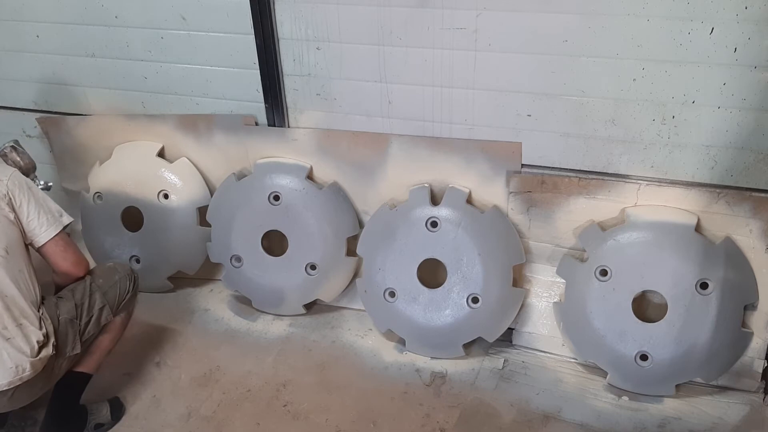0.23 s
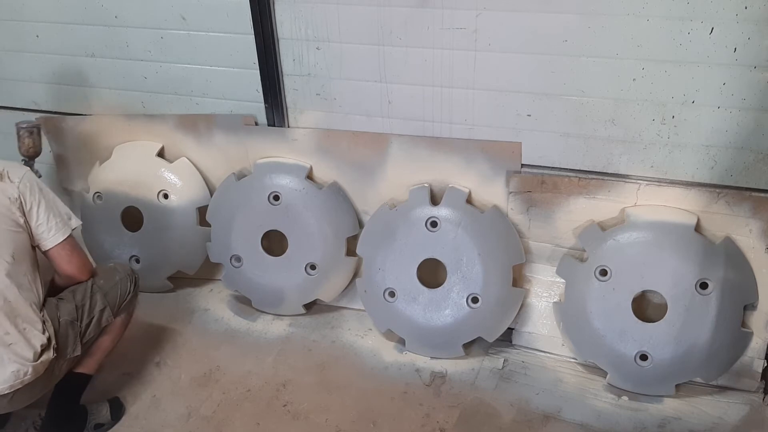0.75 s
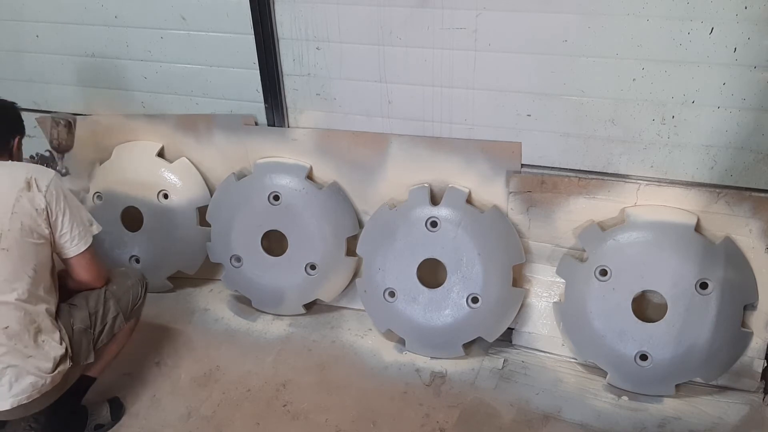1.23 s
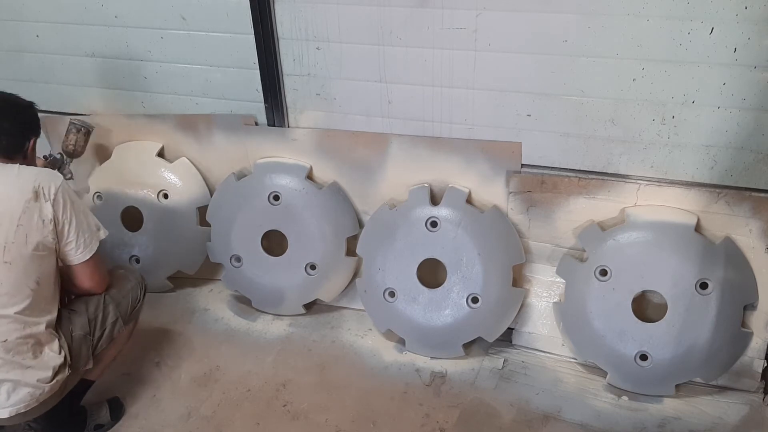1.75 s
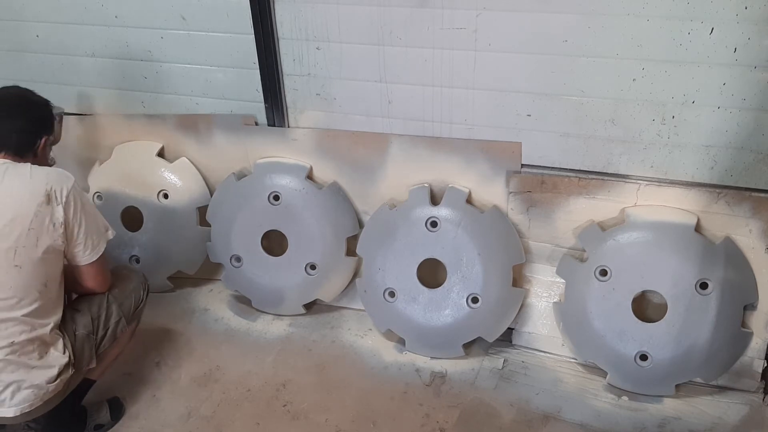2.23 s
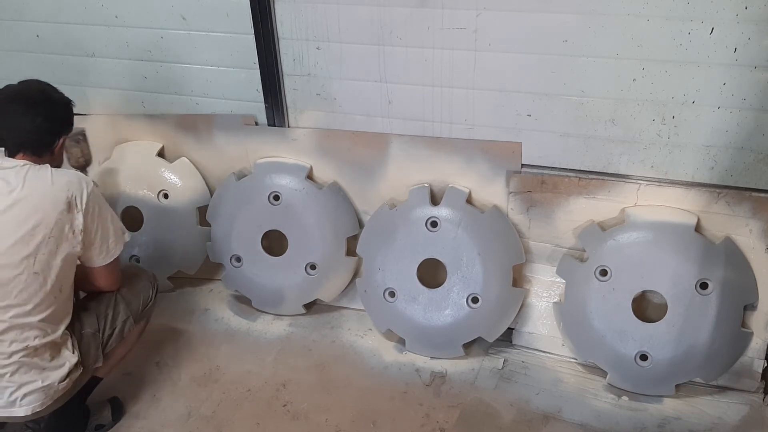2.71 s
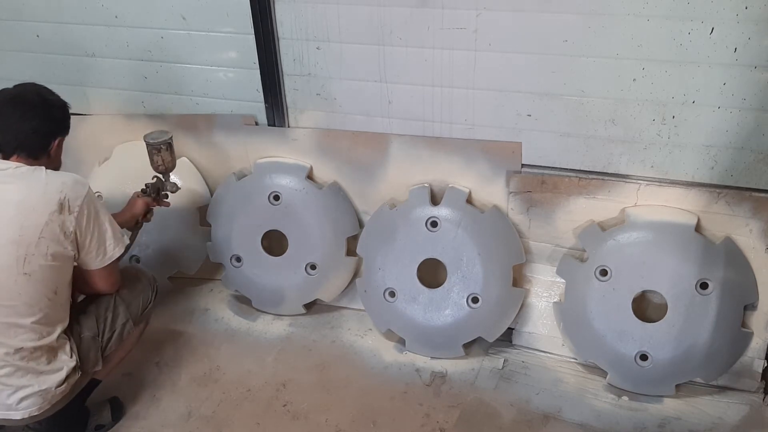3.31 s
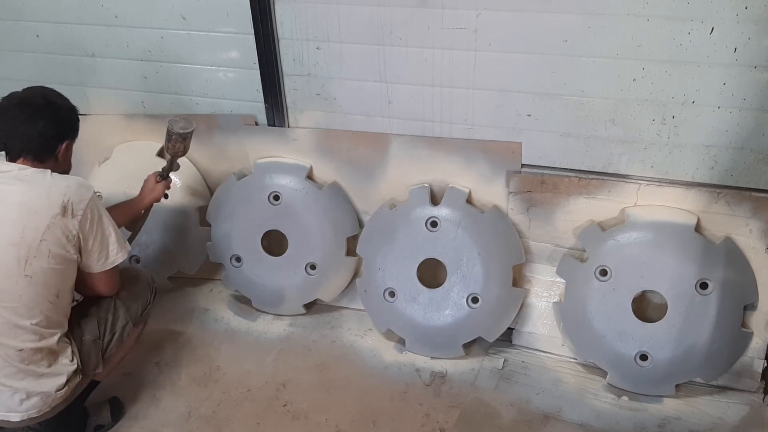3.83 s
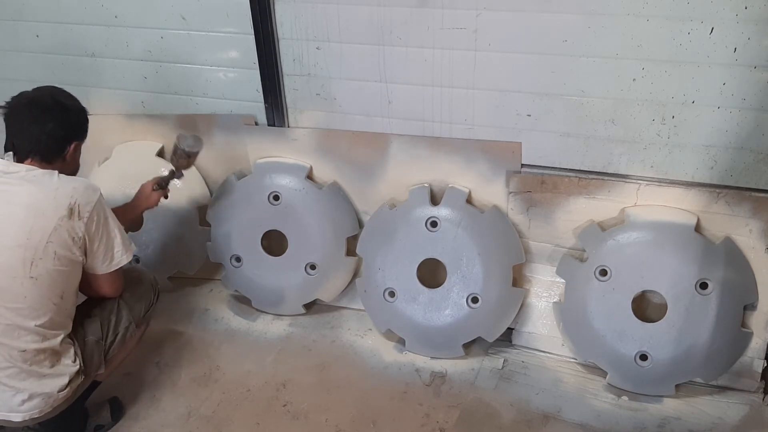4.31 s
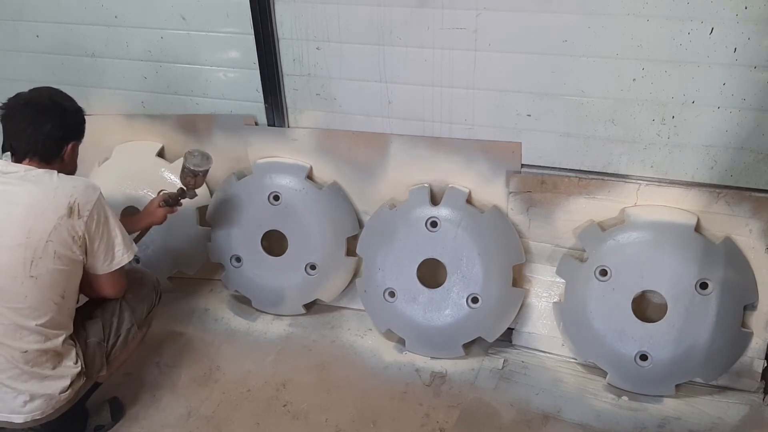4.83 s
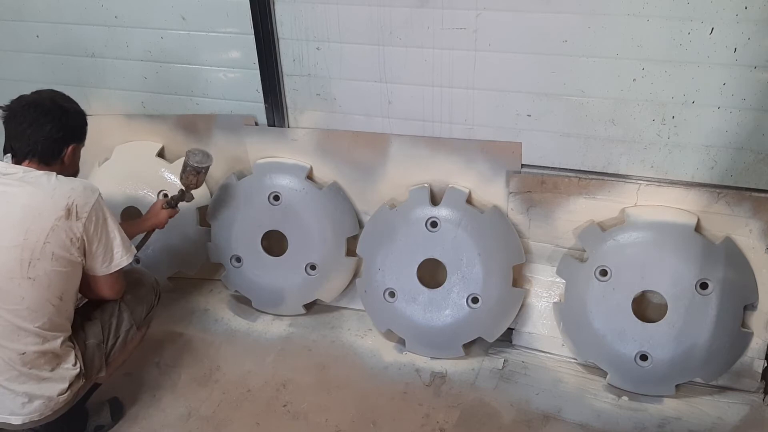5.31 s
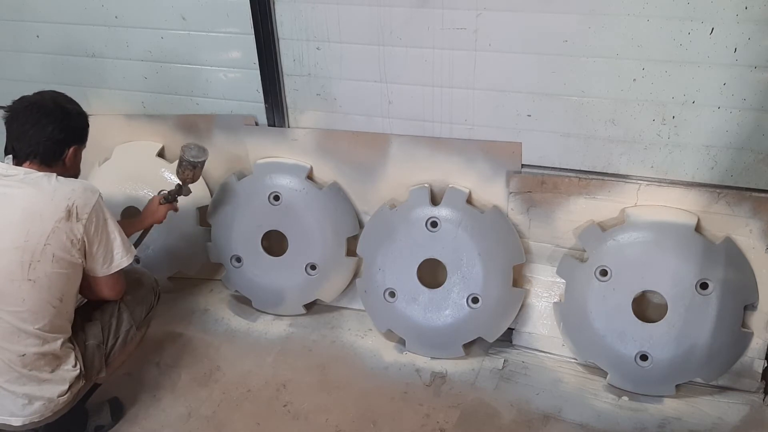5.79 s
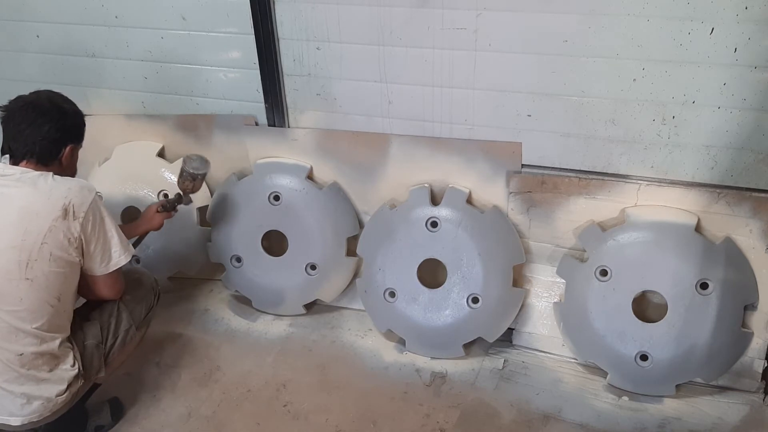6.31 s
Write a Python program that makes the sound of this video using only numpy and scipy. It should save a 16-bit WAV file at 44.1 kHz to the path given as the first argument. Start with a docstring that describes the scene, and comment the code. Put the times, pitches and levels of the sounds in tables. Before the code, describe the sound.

Close stereo pickup of a paint gun spraying metal discs: crisp, airy blasts of about a third of a second, the fourth roughly twice as long, separated by quiet gaps. Something stiff scrapes and knocks on the floor at the start, then only faint scuffs return. Tiny metal clicks with leaking air precede some blasts, and one ends the scene. The hard-walled room adds a thin, ringing tail.

```python
"""In a bare workshop, a compressed-air paint gun is triggered eight times at heavy iron discs.
Each pull is six bands of noise, from nozzle hiss to thump, shaped by air pressure; the discs ring on after.
Short noise ticks with a thin leak come before five of the pulls and once after the last one.
Something stiff scuffs over the floor: random small slips ring a sheet, with larger knocks among them.
Walls add standing waves and a long tail over a faint hiss. Two close microphone ports hear it from one side."""
import sys
import numpy as np
from scipy import signal
from scipy.fft import rfft, irfft, next_fast_len
from scipy.io import wavfile
from scipy.ndimage import uniform_filter1d

SR = 44100
rng = np.random.default_rng(int(sys.argv[2]) if len(sys.argv) > 2 else 0)


def volts_from_decibels(level):
    """Turn decibel levels (scalar or array-like) into linear amplitude factors."""
    exponent = np.asarray(level, float) / 20
    return 10 ** exponent


def wrap_up_sound(samples):
    """Save the sound to the file named by the first command line argument, as 16-bit audio."""
    columns = np.atleast_2d(samples).T
    # keep every value between -1 and 1, then stretch to whole-number steps
    tamed = np.clip(columns, -1, 1)
    steps = np.round(tamed * 32767).astype(np.int16)
    wavfile.write(sys.argv[1], SR, steps)


N = 288855


def evened(x):
    """Scales to rms 1."""
    return x / np.sqrt(np.mean(x ** 2) + 1e-20)


def read(points, hz, axis=1):
    """Reads a column of a table on a log-frequency axis."""
    table = np.transpose(points)
    return np.interp(np.log(hz + 1), np.log(table[0] + 1), table[axis])


def add(mix, s, sound):
    """Mixes a sound in from time s, trimmed to the length of the mix."""
    at = round(s * SR)
    part = mix[:, max(at, 0):][:, :sound.shape[1] + min(at, 0)]
    part += sound[:, max(-at, 0):][:, :part.shape[1]]


def humps(peaks, hz):
    """Sums the responses of resonances given as (Hz, width in Hz, dB)."""
    return sum(volts_from_decibels(db) / (1 + 2j * (hz - centre) / width) for centre, width, db in peaks)


def ring(hz, width, count=2048):
    """A damped swing with a soft start, peak 1; a wider resonance dies faster."""
    t = np.arange(count) / SR
    soft_start = 1 - np.exp(-t * hz)
    swing = soft_start * np.exp(-np.pi * width * t) * np.sin(2 * np.pi * hz * t)
    return swing / abs(swing).max()


def port_noise(count, gain, lead_s, centred=0):
    """Noise at both ports: a shared part reaches the left port first; gain(hz) colours it all."""
    # Each row: frequency in Hz, likeness of the two ports from 0 to 1.
    likeness = [(60, 0.69), (200, 0.94), (600, 0.7), (1500, 0.11), (4000, 0.095), (9000, 0.13),
                (13000, 0.12)]
    # Shade of the housing. Each row: frequency in Hz, left minus right in dB.
    housing_shade = [(100, -1), (700, 0), (2400, -1), (4400, 0.5), (8000, 0), (11000, -3), (15000, -2.5)]
    size = next_fast_len(count)
    hz = np.fft.rfftfreq(size, 1 / SR)
    left, other = rfft(rng.standard_normal((2, size)))
    alike = np.clip(read(likeness, hz), 0, 1)
    delayed = left * np.exp(-2j * np.pi * hz * lead_s)
    right = alike * delayed + np.sqrt(1 - alike ** 2) * other
    # the top treble narrows to the middle
    same = np.clip(centred, 0, 1) * np.clip((hz - 10800) / 2600, 0, 1)
    right = same * left + np.sqrt(1 - same ** 2) * right
    lean = volts_from_decibels(read(housing_shade, hz) / 2)
    ports = np.array([left * lean, right / lean])
    return evened(irfft(ports * gain(hz), size)[:, :count])


def burst(row, pull, lead_us, centred, hum_db, flutter_db=0.5):
    """Turbulent air: each part of the jet swells fast as the valve opens and dies away after release."""
    # Colour of the jet. Each row: frequency in Hz, relative level in dB per Hz.
    jet_colour = [(24, -34.5), (40, -19), (250, -10), (380, -11), (620, -9), (1400, -7.5), (2000, -10.5),
                  (3080, -7.5), (5500, -2.5), (7750, 0.5), (8300, -2), (9000, -7), (10500, -0.5),
                  (12200, 4.5), (13500, 0.5), (15000, 4), (15700, -2)]
    # Six parts of the jet, high to low. Each row: low edge in Hz, high edge in Hz,
    # fall in dB per s as the air bleeds out.
    jet_parts = [(8800, SR, 253), (3700, 9920, 199.5), (1780, 4030, 173.5), (444, 1800, 170.5),
                 (126, 378, 186), (40.9, 158, 179)]
    # How fast each part swells up to the opening, in dB per ms.
    opening_rises = [3.1, 2.2, 1.9, 1.7, 1.5, 1.2]
    # Each part while the trigger is held. Each row: level against the hiss in dB, share of the surge,
    # share of the body, shortfall at opening in dB, build-up in s, droop at release in dB, droop time in s.
    held_parts = [(0, 0.91, 0.27, 2.5, .012, 1.5, .03), (-3.5, 0.4, 0.68, 4.5, 0.033, 2, 0.066),
                  (-9, 0.00073, 0.73, 9.5, 0.03, 5.5, .07), (-18.5, 0, 0.84, 14.5, 0.088, 8.5, 0.049),
                  (-38, 0.061, 0.66, 22, .05, 6.5, .05), (-50.5, 0.045, 0.32, 0.5, .05, -1.5, .05)]
    # 1 for each part that swells when the jet crosses an edge or a hole.
    gusty = [0, 0, 0, 1, 1, 1]
    # Such crossings. Each row: time in s, half length in s, roar in dB, buffeting in dB, thump in dB.
    crossings = [(.09, 0.065, -57, -66, -79), (0.333, .12, -45.5, -53.5, -77), (0.432, .04, -63, -59, -61),
                 (0.884, 0.033, -55, -72, -59), (1.12, 0.057, -77, -63, -79), (1.243, 0.057, -60, -50, -65),
                 (1.638, 0.068, -62, -74, -69), (1.79, 0.042, -52, -47.5, -66),
                 (1.913, 0.072, -55, -48, -62.5), (2.511, 0.065, -68, -56, -59),
                 (2.65, .08, -55, -57.5, -68), (2.79, .06, -50.5, -70, -76), (2.924, 0.067, -54, -72, -82),
                 (3.056, .05, -62, -65, -80), (3.899, 0.06, -56, -51.5, -58.5),
                 (4.025, 0.085, -53.5, -63.5, -75), (4.14, 0.045, -64.5, -57, -68),
                 (4.587, 0.043, -52, -50.5, -59), (4.686, 0.082, -55.5, -60, -68),
                 (5.266, .06, -57, -61, -68), (5.357, 0.067, -52.5, -69, -86),
                 (5.479, 0.076, -62, -57.5, -81), (5.895, 0.043, -58, -59, -59),
                 (5.987, .05, -54.5, -55, -74), (6.07, 0.09, -59, -58.5, -70.5)]
    # Air blown across a hole in the disc hums: frequency in Hz, width in Hz.
    hollow = (253.6, 18)

    s, held, hiss_db, surge_db, body_db = row
    drain, pan_db, lift_db = pull
    t = np.arange(-.05, held + .45, 1 / SR)
    now = np.clip(t, 0, held)
    # stored pressure peaks 21 ms after opening, then drains to the steady flow
    surge = surge_db * np.exp(-((now - 0.021) / drain) ** 2)
    # the paint needle shuts 30 ms before the air valve
    surge += lift_db * np.exp(-((held - 0.03 - now) / 0.036) ** 2)
    gusts = [g for g in crossings if s - .02 < g[0] < s + held + .02]
    out = np.zeros((2, len(t)))
    for k, ((lo_hz, hi_hz, fall), rise, part) in enumerate(zip(jet_parts, opening_rises, held_parts)):
        def colour(hz):
            band = 1 / np.sqrt((1 + (lo_hz / (hz + 1)) ** 8) * (1 + (hz / hi_hz) ** 8))
            hum = abs(2 + humps([(*hollow, hum_db)], hz))
            return band * volts_from_decibels(read(jet_colour, hz)) * hum
        rel_db, by_surge, by_body, short_db, build, droop_db, droop = part
        flow_db = hiss_db + rel_db + by_surge * surge + by_body * body_db
        flow_db = flow_db - short_db * np.exp(-now / build) - droop_db * np.exp((now - held) / droop)
        flow = volts_from_decibels(flow_db)
        if gusty[k]:
            # parts 3, 4 and 5 take the roar, buffeting and thump columns
            flow = flow + sum(volts_from_decibels(g[k - 1]) * np.exp(-((s + now - g[0]) / g[1]) ** 2) for g in gusts)
        edges_db = 1000 * rise * np.maximum(-t, 0) + fall * np.maximum(t - held, 0)
        eddies = evened(uniform_filter1d(rng.standard_normal(len(t)), size=60))  # the flow flutters
        level = flow * volts_from_decibels(flutter_db * eddies - edges_db)
        out += level * port_noise(len(t), colour, lead_us / 10 ** 6, centred)
    pan_db = pan_db + 0.11 * surge  # the surge evens out left and right
    return s + t[0], out * volts_from_decibels([pan_db / 2, -pan_db / 2])


def iron(x):
    """The jet drives the discs; each is tuned a little differently, so every mode is a dense, fuzzy cluster."""
    # Each row: frequency in Hz, width in Hz, relative level in dB, time to fall 60 dB in s.
    disc_modes = [(1356, 30, -20, .7), (1550, 30, -17, .9), (2905, 40, -12, 1.1), (5440, 170, -18, .9),
                  (7515, 150, -20, 1), (12360, 160, -17, .9), (15350, 120, -17, 1)]
    t, bins = np.arange(SR) / SR, np.fft.rfftfreq(SR, 1 / SR)
    out = 0
    for hz, width, db, t60 in disc_modes:
        band = np.exp(-2 * ((bins - hz) / width) ** 2)
        cluster = evened(irfft(rfft(rng.standard_normal((2, SR))) * band))
        decay = volts_from_decibels(db - 60 * t / min(t60, 1.2))
        out = out + decay * cluster * np.sqrt(width / (t60 * SR ** 2))
    return signal.fftconvolve(x, out, axes=1)[:, :N]


def tick(s, tick_db, leak_db):
    """The trigger takes up its slack: a short metal tick over a thin leak of air, both of noise."""
    # Each row: frequency in Hz, relative level in dB per Hz.
    tick_colour = [(880, -67.5), (1500, -27.5), (1770, -24.5), (2780, -10), (4580, -6), (5690, 2),
                   (8750, -6), (13700, 3.5), (15600, -6)]
    t = np.arange(round(.12 * SR)) / SR
    click = volts_from_decibels(tick_db - 60 * t / 0.0068)
    leak = volts_from_decibels(leak_db - 60 * t / .5) * np.minimum((t[-1] - t) / .01, 1)
    attack = np.minimum(t / .0007, 1)
    noise = port_noise(len(t), lambda hz: volts_from_decibels(read(tick_colour, hz)), 9e-5)
    return s - .001, (click + leak) * attack * noise


def scuff(s, rise, fall, top_db, bright_db, slips_per_s=350, spread_db=3.5, apart=.45):
    """Uneven small slips, each setting off one resonance of a stiff sheet."""
    # What rings under the scuff. Each row: frequency in Hz, width in Hz, relative level in dB.
    sheet = [(328, 140, -13), (416, 65, -4.5), (583, 210, 1.5), (600, 140, -5), (800, 120, -1),
             (963, 97, -1.5), (1205, 160, -2), (1507, 220, -6), (2060, 400, -12), (3200, 2200, -13.5)]
    t = np.arange(-.3, .4, 1 / SR)
    away = np.where(t < 0, t / rise, t / fall)
    rung = np.zeros((2, len(t)))
    for hz, width, db in sheet:
        when, size, sign = rng.random((3, 2, len(t)))
        slipping = when < slips_per_s * width / (100 * SR)  # rate is per 100 Hz of width
        slips = slipping * volts_from_decibels(-spread_db * np.log(size + .02)) * np.sign(sign - .5)
        # less alike at the two ports higher up
        ports = slips[0] + apart * np.array([[1], [-1]]) * slips[1] * min(hz / 1200, 1.5)
        lift_db = bright_db * max(np.log2(hz / 700), 0)
        rung += volts_from_decibels(db + lift_db) * signal.oaconvolve(ports, ring(hz, width)[None])[:, :len(t)]
    # 22 dB down once the rise or fall time away from the top
    return s + t[0], volts_from_decibels(top_db - 22 * away ** 2) * evened(rung)


def knocks():
    """Single strong slips, each a damped swing a few cycles long."""
    # Each row: time in s, relative level in dB, frequency in Hz.
    large_slips = [(0.009, -35.5, 581), (0.134, -39, 620), (0.266, -30, 617), (0.338, -41, 1310),
                   (0.344, -47, 565), (0.352, -45, 1280), (0.448, -40, 616), (0.678, -34.5, 579),
                   (0.724, -41, 545), (0.805, -35.5, 676), (0.819, -39.5, 503), (0.843, -42, 614)]
    out = np.zeros((1, N))
    for s, db, hz in large_slips:
        add(out, s, volts_from_decibels(db) * ring(hz, 110)[None])
    return out


def standing(x, share=1.1):
    """Low standing waves between the walls lift and prolong narrow bands."""
    # Each row: frequency in Hz, width in Hz, relative level in dB.
    wall_modes = [(156.2, 13.3, -7.5), (249.5, 4.3, -3.5), (318, 8.5, -3.5), (429, 13, -13.5),
                  (528, 9.6, 1.5), (620.5, 6.4, 0.5), (729, 13, -7.5), (900, 11, -23.5), (1320, 28, -20),
                  (1525, 21, -1), (2041, 23, 0)]
    size = next_fast_len(N + SR)
    response = 1 + share * humps(wall_modes, np.fft.rfftfreq(size, 1 / SR))
    return irfft(rfft(x, size) * response, size)[:, :N]


def shop(x):
    """Dense reflections, each band dying at its own speed, unlike at the two ports."""
    # Long tail of the shop. Each row: frequency in Hz, level in dB, time to fall 60 dB in s.
    tail_bands = [(100, -35, 0.52), (500, -18, 0.77), (2000, -18.5, 0.28), (3500, -37, 2.2),
                  (4970, -26, 1.1), (5600, -21, 1.8), (7500, -41.5, 1.9), (8800, -37.5, 0.62),
                  (10200, -32, 1), (10500, -29.5, 1), (12300, -39.5, 1.3), (13900, -35.5, 1.3),
                  (15600, -30, 1.1)]
    hz, t, z = signal.stft(rng.standard_normal((2, SR)), SR, nperseg=256)
    t60 = np.maximum(read(tail_bands, hz, axis=2), .1)[:, None]
    decay = volts_from_decibels(read(tail_bands, hz)[:, None] - 60 * t / t60)
    z = z * decay * np.sqrt(6 * np.log(10) / (t60 * SR))  # a long tail gets no more energy than a short one
    tail = signal.istft(z, SR, nperseg=256)[1]
    return signal.fftconvolve(x, tail, axes=1)[:, :N]


def faint_hiss():
    """Steady coloured noise under everything, its level wavering slowly."""
    # Each row: frequency in Hz, relative level in dB per Hz.
    hiss_colour = [(35, -27.5), (60, -3), (237, -11.5), (313, -12.5), (465, -16.5), (615, -16),
                   (1030, -21.5), (1210, -15.5), (4550, -23), (6300, -6.5), (9140, -14), (10800, -6.5),
                   (12700, -7), (14500, -7), (15600, -9)]
    # Each row: time in s, change of level in dB.
    waver = [(0, 4.5), (1.5, 0), (2.3, -3), (3.45, -2.5), (3.65, -2.5), (3.8, 0), (4.4, -2), (5.099, -4.5),
             (5.75, -0.5), (6.55, -4.5)]
    sway_db = np.interp(np.arange(N) / SR, *np.transpose(waver))
    return volts_from_decibels(-67.5 + sway_db) * port_noise(N, lambda hz: volts_from_decibels(read(hiss_colour, hz)), 0)


def scene():
    """Gun, trigger and scuffs in the shop, over a faint hiss."""
    # Trigger pulls. Each row: valve opens in s, held in s, steady hiss in dB,
    # pressure surge at opening in dB, body of the spray in dB.
    bursts = [(0.0, 0.43, -32.5, 13, -0.5), (0.884, 0.37, -31, 11, -2), (1.612, 0.32, -32, 7, 1),
              (2.426, 0.64, -34, 11, 1.5), (3.819, 0.32, -32.5, 11.5, 1.5), (4.53, .245, -32, 9, 1),
              (5.16, 0.34, -32, 10, 0.5), (5.835, 0.3, -32, 9, 1.5)]
    # How each pull goes. Each row: surge drain time in s, left minus right in dB before the surge evens it,
    # lift of the hiss in dB as the paint needle shuts.
    pulls = [(0.11, -2.5, 1.5), (0.1, -2.5, 1.5), (0.075, -2.6, 1.5), (0.13, -2.5, 0.5), (0.11, -2.5, -1),
             (.09, -2.5, 2.5), (0.11, -2.5, 1.5), (.08, -2.5, 0)]
    # Each row, one a burst: lead of the left port in microseconds,
    # share (0 to 1) of the top treble that sits in the centre.
    leads = [(146, 0.98), (132, 1), (122, 0.94), (96, 0.43), (78.5, 0), (96, 0), (95, 0), (94.3, 0.76)]
    # How strongly each burst sounds the hum of the hole, in relative dB.
    hums = [-5, -5, 14, 1, -21, 7.5, -11, 13]
    # How well each burst drives the discs, in relative dB.
    struck = [9.5, 7.5, -4, 13, -13.5, -3, -10, 8.5]
    # Each row: time of the trigger tick in s, tick in dB, leak of air in dB.
    ticks = [(0.8, -66, -60), (1.5287, -59, -80), (2.355, -56, -59), (4.47, -44, -58), (5.7842, -48, -56),
             (6.5012, -52.5, -61.5)]
    # Each row: loudest moment in s, rise in s, fall in s, relative level in dB,
    # brightness in dB per octave above 700 Hz.
    scuffs = [(.01, 0.068, 0.23, -46, 1.5), (.28, 0.068, 0.065, -46.5, -4), (.345, .04, .05, -41, 6),
              (.4, 0.19, 0.17, -41.5, -3), (.655, 0.056, 0.071, -55, -2), (.7, 0.042, 0.17, -44, -2.5),
              (0.809, 0.11, 0.2, -40.5, 0.5), (.98, .04, 0.071, -50.5, -8), (1.44, 0.12, 0.14, -73, -1),
              (2.195, 0.0089, .2, -73.5, -17), (3.17, 0.1, 0.12, -54, 1.5), (3.26, 0.11, 0.21, -64, 1.5),
              (3.52, .015, .14, -76, -5), (4.93, 0.13, 0.21, -77, -4), (5.3, .08, 0.23, -56.5, -8),
              (5.5, 0.17, 0.12, -57, -11), (6.391, 0.16, 0.11, -78, 6.5), (6.53, 0.1, 0.035, -83, 3.5)]

    near, floor, drive = np.zeros((3, 2, N))
    for row, pull, ports, hum_db, drive_db in zip(bursts, pulls, leads, hums, struck):
        s, jet = burst(row, pull, *ports, hum_db)
        add(near, s, jet)
        add(drive, s, volts_from_decibels(drive_db) * jet)
    for row in ticks:
        add(near, *tick(*row))
    for row in scuffs:
        add(floor, *scuff(*row))
    floor = (floor + knocks()) * volts_from_decibels([[-1.8], [1.8]])  # to the right
    near += floor
    discs = volts_from_decibels(8) * iron(drive + floor)  # the scuffs set the discs ringing too
    return standing(near) + shop(near) + discs + faint_hiss()


def roll_off(x):
    """The treble ends steeply here."""
    return signal.sosfilt(signal.butter(12, 17020, fs=SR, output="sos"), x)


def record(dry):
    """A weak bass below 45 Hz and a sharp band edge at 15760 Hz."""
    taps = signal.firwin(1023, 15760, window=("kaiser", 9), fs=SR)
    thin = signal.sosfilt(signal.butter(2, 45, "high", fs=SR, output="sos"), dry)
    return roll_off(signal.oaconvolve(thin, taps[None], "same"))


dry = scene()
out = record(dry)
wrap_up_sound(out)
```